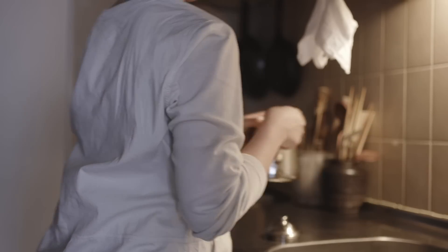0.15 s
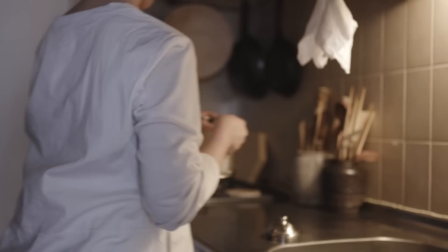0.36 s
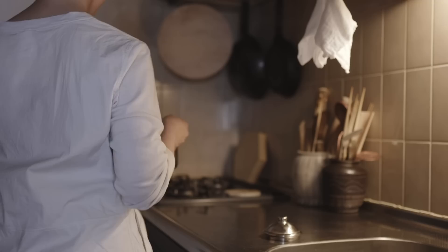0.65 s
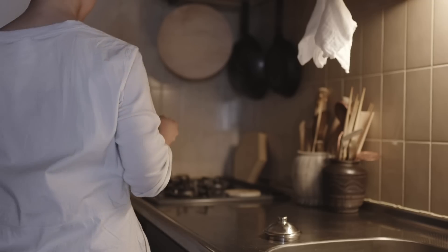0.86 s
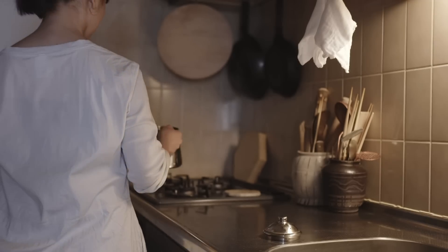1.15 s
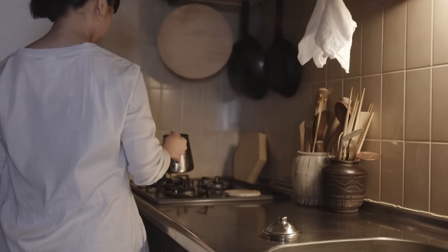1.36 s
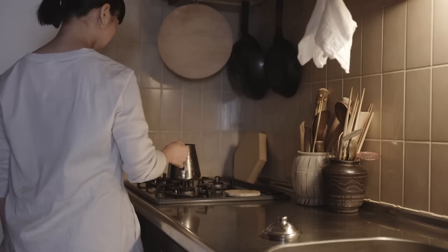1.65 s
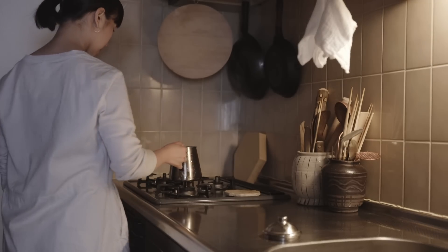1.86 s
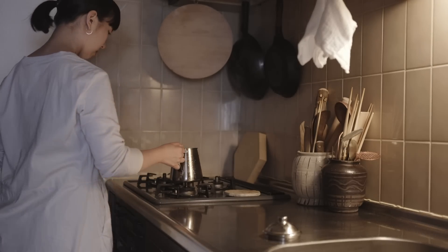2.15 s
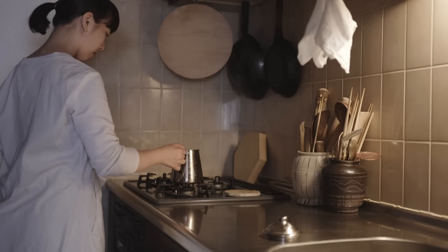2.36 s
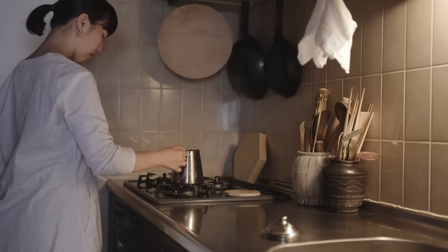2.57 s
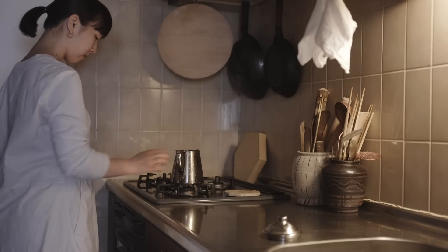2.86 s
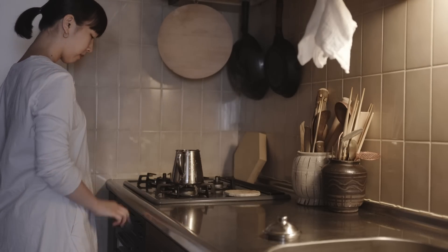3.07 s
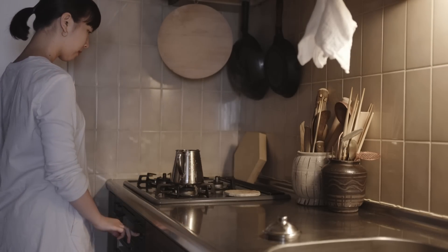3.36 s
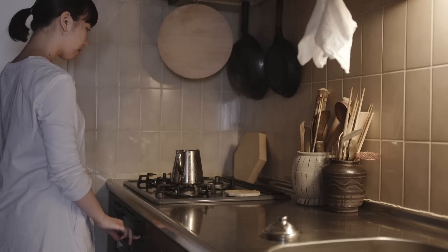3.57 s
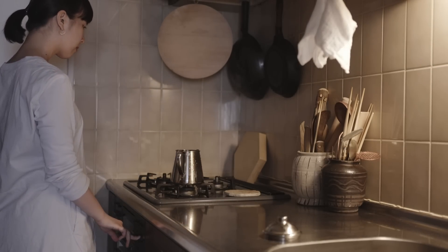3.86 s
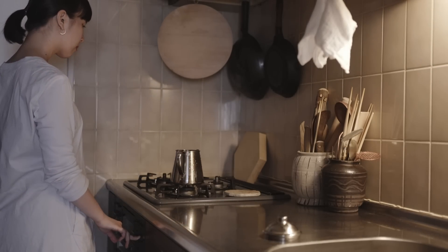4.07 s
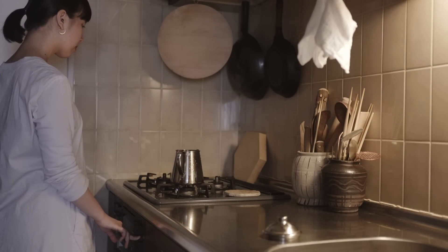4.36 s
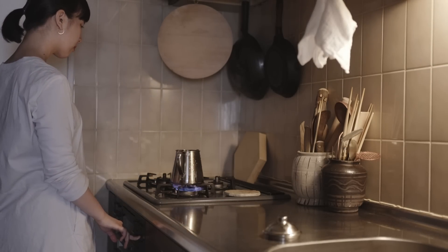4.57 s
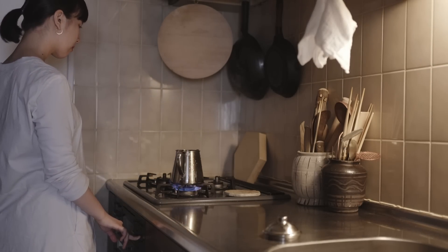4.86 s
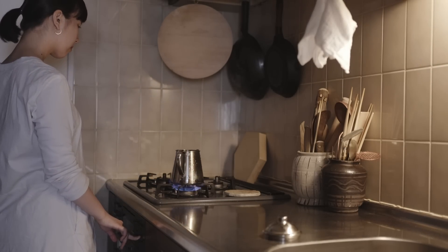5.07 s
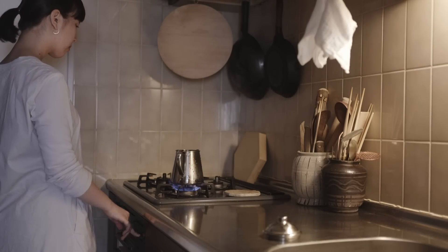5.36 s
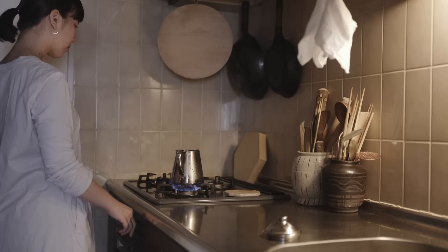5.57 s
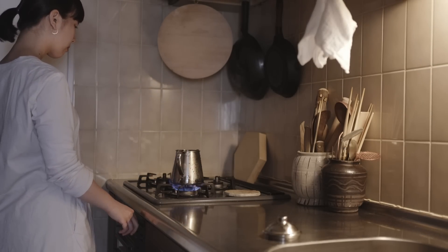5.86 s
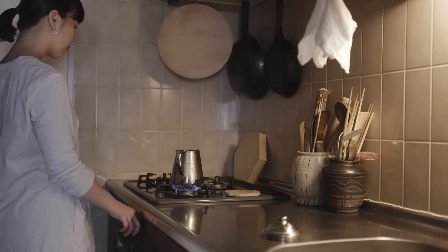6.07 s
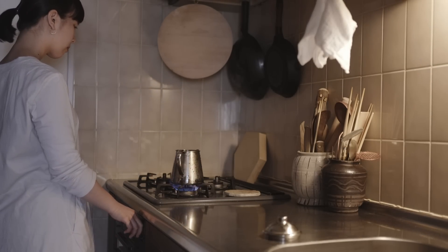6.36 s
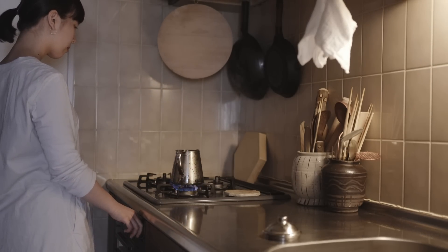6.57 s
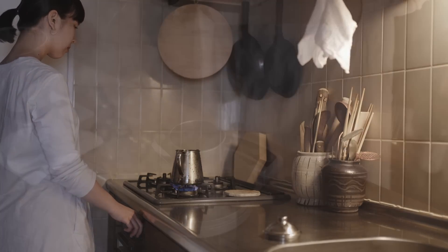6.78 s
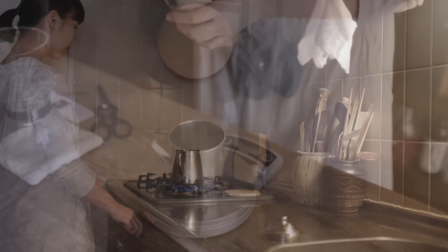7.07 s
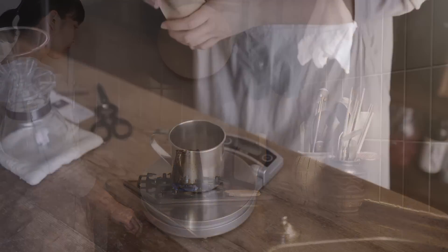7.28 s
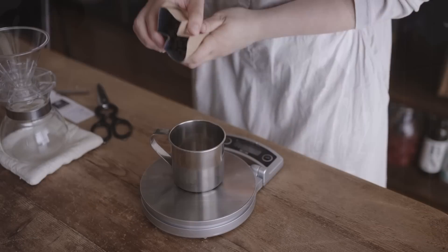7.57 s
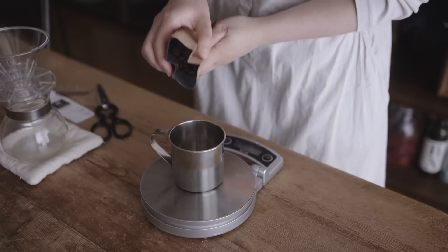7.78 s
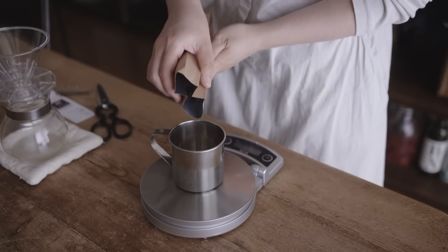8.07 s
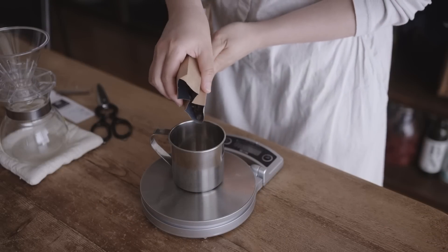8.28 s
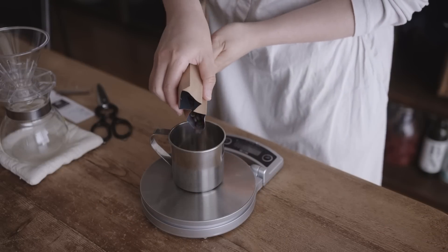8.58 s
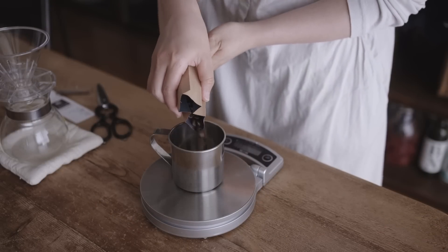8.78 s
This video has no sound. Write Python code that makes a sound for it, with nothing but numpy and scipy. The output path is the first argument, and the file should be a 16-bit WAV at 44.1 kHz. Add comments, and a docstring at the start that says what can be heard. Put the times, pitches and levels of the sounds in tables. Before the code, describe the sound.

A steel pot is set on a gas hob, the igniter snaps rapidly, then a paper bag rustles and roasted beans clatter into a metal mug.

```python
"""A gas igniter snaps fourteen times under a steel coffee pot in a tiled kitchen while the gas catches.
Each snap is one sharp impulse plus its reflections; dull ticks and two puffs of flame are shaped pulses and noise.
Before that the pot is set on the hob, with short noisy knocks, a metal ring and swishing cloth.
Afterwards a paper bag rustles and roasted beans slide in it, made of many tiny clicks.
Then the first few beans crack and ring in a steel mug; low room noise lies under it all, with a whine that fades."""
import sys
import numpy as np
from scipy import signal
from scipy.fft import rfft, irfft
from scipy.io import wavfile

SR = 44100
rng = np.random.default_rng(int(sys.argv[2]) if len(sys.argv) > 2 else 0)


def wav_record(signal):
    """Record a signal, one row per channel, as 16-bit PCM in the file named by sys.argv[1]."""
    frames = np.transpose(np.atleast_2d(signal))
    bounded = np.clip(frames, -1, 1)
    # unit amplitude maps onto the largest positive 16-bit level
    quanta = np.round(bounded * 32767).astype(np.int16)
    wavfile.write(sys.argv[1], SR, quanta)


N = 393372
TIME = np.arange(N) / SR   # seconds
AGE = TIME[:2 ** 14]   # seconds since a blow

# Ways a spark's sound travels by pot, hob and wall. Each row: delay in ms, average level in dB.
SPARK_PATHS = [(.6, 9.5), (1.4, 16), (3.2, 15.5), (4.3, 7.5), (5.5, 14.5), (7.6, 9.5)]
# Tone of the sparks. Each row: frequency in Hz, relative level in dB per Hz.
SPARK_COLOUR = [(300, -44), (900, -18), (1400, -13.5), (2200, -11.5), (3000, -9.5), (3700, -5), (5000, -5),
                (6500, -4.5), (8000, -0.5), (9000, -3), (11500, 5.5), (14000, 5), (16000, 4)]
# Resonances of the gap between burner and pot. Each row: frequency in Hz, width in Hz, level in dB.
BURNER_GAP = [(1796, 210, -5.5), (5560, 920, -1), (7120, 170, 7), (9300, 370, -11), (10770, 540, -5)]
# The igniter recharges at a steady rate, a little slower once the flame burns.
FIRST_SPARK_S, CATCH_S = 3.869, 4.3997
COLD_PERIOD_S, LIT_PERIOD_S, COLD_SPARKS, LIT_SPARKS = .13276, .13513, 4, 9
# Sparks grow as gas gathers, peak as it catches, then are weaker in the flame.
COLD_DB, COLD_RISE_DB_PER_S, CATCH_DB, LIT_DB, LIT_RISE_DB_PER_S = -13.4, 4.5, -9.5, -15.5, 1.2
# A dull tick follows each cold spark and the last one; the delay runs to the middle of the tick.
DULL_TICK_DELAY_S, DULL_TICK_PEAK_DB = .0042, -30

# Bright ticks of the pot's handle and of the knob going in.
# Each row: start in seconds, strength in dB, contact cut-off in Hz.
KNOB_TICKS = [(1.146, -43, 15000), (3.5705, -35.5, 15000), (3.575, -26.5, 15000)]
# Tone of those bright ticks. Each row: frequency in Hz, relative level in dB per Hz.
KNOB_COLOUR = [(300, -9.5), (1500, -13), (3200, -11.5), (4000, -1), (5500, 0), (7200, -7.5), (10000, -8),
               (12500, 1.5), (16000, -2)]
# Gas flaring as it catches. Each row: start in seconds, hold in seconds, level in dB.
FLARES = [(4.404, .12, -47), (5.349, 0.036, -45)]
FLARE_RISE_S, FLARE_FALL_DB_PER_S = .04, 160
# Tone of the flame. Each row: frequency in Hz, relative level in dB per Hz.
FLAME_COLOUR = [(60, -6), (200, -7), (330, 1), (700, -2.5), (1450, -2.5), (2100, -8.5), (4000, -21)]

# Beans landing in the mug. Each row: start in seconds, strength in dB, contact cut-off in Hz.
BEANS = [(8.5361, 0.5, 15000), (8.5418, -7, 15000), (8.5975, -11.5, 8000), (8.643, -10, 2400),
         (8.7355, -1, 11100), (8.791, -12.5, 3500), (8.8204, -9, 10100), (8.863, -20, 11800),
         (8.9039, -21, 3500), (8.908, -16.5, 12000)]
# Ringing of the mug. Each row: frequency in Hz, average level in dB, time to fall 60 dB in seconds.
MUG_MODES = [(790, -6, .06), (1000, -7, .1), (2700, -5, .04), (3085, 5, .11), (5880, -5, .14),
             (6600, -4, .14), (6820, -5, .15), (7750, -3, .14), (8100, -3, .15), (8970, -2, .15),
             (10400, -2, .18), (11000, -3, .2), (12630, -4, .14), (13880, -2, .12), (14350, -4, .12),
             (14810, -3, .1)]
# Tone of the bean cracks. Each row: frequency in Hz, relative level in dB per Hz.
BEAN_COLOUR = [(100, -18), (500, -23.5), (780, -2), (1500, -12), (2800, 3), (4000, -3), (6000, -0.5),
               (8000, 3.5), (11000, 1), (16000, 3.5)]
# Tone of the room's answer to the beans. Each row: frequency in Hz, relative level in dB per Hz.
BEAN_ROOM_COLOUR = [(200, -26), (550, -22), (900, -2), (1600, -7), (3000, -6), (6000, 1.5), (9000, 4),
                    (13000, 9.5), (16000, 3)]
MUG_RING_DB, MUG_ECHO_DB = -32.5, -17.5   # relative to the bean's strength
GRAZE_S, GRAZE_DB = 8.6147, -24   # one bean only grazes the wall, with a bright hiss

# Each tilt of the bag sets the beans sliding.
# Each row: start in seconds, rise in seconds, hold in seconds, level in dB.
SLIDES = [(6.76, 0.024, .28, -57), (7.11, 0.017, 0.029, -41), (7.382, 0.035, .03, -49),
          (7.692, 0.17, 0.037, -46.5), (8.025, 0.1, 0.17, -41), (8.434, 0.037, 0.36, -48.5)]
SLIDE_FALL_DB_PER_S = 66.5
# Tone of the sliding beans. Each row: frequency in Hz, relative level in dB per Hz.
SLIDE_COLOUR = [(150, -23.5), (400, -15.5), (700, -8.5), (1180, -0.5), (1600, -2), (2200, -5.5),
                (3500, -8.5), (6000, -14.5), (10000, -30), (16000, -32)]
# Fingers brushing the paper. Each row: start in seconds, hold in seconds, level in dB.
BRUSHES = [(6.778, 0.12, -53), (7.086, 0.25, -47), (7.765, .07, -54), (8.082, 0.17, -49.5),
           (8.58, .27, -46)]
BRUSH_RISE_S, BRUSH_FALL_DB_PER_S = 0.065, 78
# Tone of brushed paper. Each row: frequency in Hz, relative level in dB per Hz.
PAPER_COLOUR = [(1500, -12), (3500, -2), (6000, -1.5), (9000, -2.5), (13000, -0.5), (16000, -2)]
# Separate creases snapping in the bag, some strong and some faint.
# Each row: start in seconds, strength in dB, contact cut-off in Hz.
CREASES = [(6.869, -53, 16000), (7.119, -36, 6000), (7.174, -40, 6000), (7.627, -60, 16000),
           (7.756, -42.5, 9000), (8.074, -33, 9200), (8.129, -38.5, 15000), (8.164, -36.5, 9000),
           (8.38, -40.5, 9000), (8.459, -34.5, 4000)]
# Tone of the creases. Each row: frequency in Hz, relative level in dB per Hz.
CREASE_COLOUR = [(120, -15.5), (400, -9.5), (800, -6), (1300, 0.5), (2200, -9), (3600, -3), (6500, -13.5),
                 (16000, -12.5)]
# More creases come at random: rate while beans slide, and contact cut-off.
RANDOM_CREASES_PER_S, RANDOM_CREASE_HZ = 14, 7000
RANDOM_CREASE_DB, RANDOM_CREASE_SPREAD_DB = -2.5, 4   # strength relative to the sliding beans

# Blows on the iron grate, from the pot and from the knob's jolt.
# Each row: start in seconds, strength in dB, contact cut-off in Hz, dB lost per rebound.
GRATE_KNOCKS = [(2.33, -30.5, 7000, 2.5), (2.453, -33.5, 5870, 14), (2.509, -29.5, 12900, 2.5),
                (2.756, -42, 6800, 5.5), (3.602, -39.5, 900, 14)]
# Tone of the grate. Each row: frequency in Hz, relative level in dB per Hz.
GRATE_COLOUR = [(60, -12), (200, -15.5), (340, -4), (500, -5), (700, -6), (1000, -11.5), (2500, -11),
                (4500, -12), (8000, -15.5), (16000, -14.5)]
REBOUND_S, REBOUND_KEEPS_HZ = .017, 0.55   # time between rebounds; share of the cut-off that each keeps
# Light clinks of the pot. Each row: start in seconds, strength in dB, contact cut-off in Hz.
CLINKS = [(2.078, -41, 14000), (2.087, -38.5, 16000)]
# Tone of the clinks. Each row: frequency in Hz, relative level in dB per Hz.
CLINK_COLOUR = [(500, -20), (900, 7.5), (1750, -6), (2200, 2), (4700, -3.5), (6000, 5), (8000, -8),
                (12500, 0), (16000, -11)]
# Ringing of the pot. Each row: frequency in Hz, average level in dB, time to fall 60 dB in seconds.
POT_MODES = [(900, 0, .08), (2240, -1, .08), (3400, -4, .12), (4295, 3, 0.31), (5920, -4, 0.1),
             (6300, -3, 0.11), (7600, -9, .13), (8450, -4.5, 0.21), (12400, -6, .12), (13800, -1, .12)]
POT_RING_DB = -7   # the free wall's ring, relative to the clink's strength
# Small hard taps around the hob, before and after lighting.
# Each row: start in seconds, strength in dB, contact cut-off in Hz.
TAPS = [(.276, -51, 2540), (.404, -38.5, 12000), (1.918, -49.5, 4000), (3.303, -48, 2980),
        (3.415, -47.5, 2530), (3.44, -46, 3000), (3.495, -47, 4000), (6.125, -52.5, 3000)]
# Tone of the taps. Each row: frequency in Hz, relative level in dB per Hz.
TAP_COLOUR = [(200, -6), (600, -2), (900, 0), (1500, 1.5), (2500, -6.5), (6000, -11), (16000, -15)]
# Hollow bumps. Each row: start in seconds, strength in dB, contact cut-off in Hz.
BUMPS = [(.412, -52, 900), (.499, -38.5, 1500), (.515, -47.5, 900)]
# Tone of the bumps. Each row: frequency in Hz, relative level in dB per Hz.
BUMP_COLOUR = [(100, -36), (280, -10.5), (420, 5), (520, -14), (660, -0.5), (900, -33), (3000, -25)]
# The pot's base scraping along the grate.
# The one row: start in seconds, rise in seconds, hold in seconds, level in dB.
SCRAPE = (2.29, 0.03, 0.08, -51.5)
SCRAPE_FALL_DB_PER_S = 195

# Arm movements that swish the sleeve. Each row: start in seconds, hold in seconds, level in dB.
SWISHES = [(0.388, 0.092, -54), (0.879, 0.11, -46.5), (1.17, 0.1, -55.5), (1.295, .005, -51.5),
           (1.638, .08, -51.5)]
SWISH_RISE_S, SWISH_FALL_DB_PER_S = 0.033, 126
# Tone of the cloth. Each row: frequency in Hz, relative level in dB per Hz.
CLOTH_COLOUR = [(500, -7.5), (1000, 0), (1400, -1), (2300, -4.5), (8500, -6), (16000, -8.5)]

# Loudness of the room noise over time. Each row: time in seconds, level in dB.
AIR_LEVEL = [(0.0, -59.5), (2.41, -57), (5.62, -58), (6.7, -63)]
# Tone of the room noise. Each row: frequency in Hz, relative level in dB per Hz.
AIR_COLOUR = [(15, -30), (25, -18.5), (59, 1), (153, -11), (195, -7.5), (531, -8), (714, -9.5), (1040, -8),
              (1740, -14.5), (2110, -20), (2550, -19.5), (3080, -25.5), (8140, -26), (9840, -26.5),
              (16000, -24.5)]
# Faint electrical whine. Each row: frequency in Hz, level in dB before the fade.
WHINE = [(6751, -82), (8253, -83.5), (13873, -86.5), (14998, -83)]
# How long the kitchen echoes at length 1. Each row: frequency in Hz, time to fall 60 dB in seconds.
ROOM_T60 = [(200, 0.48), (1000, .3), (3000, 0.27), (7000, 0.24), (15000, .18)]
CUTOFF_HZ = 15950   # top of the finished sound


def igniter(room_db=-3, scatter_db=-1, scatter_s=.0034, change=0.356):
    """Each spark is one sharp impulse sent down the same paths; the wandering arc changes them a little."""
    def scattered():
        """Reflections crowd in from the hob and tiles, then the room takes over."""
        near = np.interp(AGE - scatter_s, AGE, burst(t60=0.088), left=0)
        room = room_tail(rise_s=0.00078, length=0.93)
        return from_db(scatter_db) * near + from_db(room_db) * room

    delay_ms, path_db = np.transpose(SPARK_PATHS)
    arrivals = np.round(delay_ms * SR / 1000).astype(int)
    signs = (-1) ** np.arange(len(path_db))
    out = np.zeros(N)
    usual = scattered()
    for s, db in sparks():
        snap = (usual + change * scattered()) / np.hypot(1, change)
        varied_db = path_db + rng.normal(0, 2.4, len(path_db))
        snap[arrivals] += signs * from_db(varied_db)
        add(out, s, from_db(db) * snap)
    return resonate(colour(out, SPARK_COLOUR), BURNER_GAP)


def sparks():
    """Rows (s, dB): an even run into cold gas, the spark that lights it, and an even run in the flame."""
    cold_times = COLD_PERIOD_S * np.arange(COLD_SPARKS)
    lit_times = LIT_PERIOD_S * np.arange(1, LIT_SPARKS + 1)
    cold = [(FIRST_SPARK_S + t, COLD_DB + COLD_RISE_DB_PER_S * t) for t in cold_times]
    lit = [(CATCH_S + t, LIT_DB + LIT_RISE_DB_PER_S * t) for t in lit_times]
    return cold + [(CATCH_S, CATCH_DB)] + lit


def dull_ticks():
    """Single rounded pulses, a millisecond long, heard as a dull tick."""
    out = np.zeros(N)
    pulse = np.hanning(SR // 1000)
    half_s = len(pulse) / 2 / SR
    run = sparks()
    for s, _ in run[:COLD_SPARKS] + run[-1:]:
        add(out, s + DULL_TICK_DELAY_S - half_s, from_db(DULL_TICK_PEAK_DB) * pulse)
    return out


def burner():
    """Handle and knob tick, and the gas lights in two soft puffs of noise."""
    ticks = knocks(KNOB_TICKS, KNOB_COLOUR, crack_db=6.5, crack_t60=0.014,
                   room_db=2, rise_s=0.0032, length=0.89)
    flaring = together(swell(s, FLARE_RISE_S, hold_s, db, FLARE_FALL_DB_PER_S) for s, hold_s, db in FLARES)
    flame = colour(rng.standard_normal(N), FLAME_COLOUR)
    return ticks + flaring * flame


def mug():
    """A hard bean cracks on the steel with a pitch of its own, sets the wall ringing and wakes the room."""
    cracks, rings, echoes = np.zeros((3, N))
    for s, db, contact_hz in BEANS:
        shell = [(rng.uniform(5600, 8500), 1800, -2)]   # Hz, width Hz, dB
        crack = resonate(burst(t60=0.0064), shell)
        echo = room_tail(rise_s=0.00045, length=0.99)
        add(cracks, s, from_db(db) * soften(crack, contact_hz))
        add(rings, s, from_db(db + MUG_RING_DB) * soften(ringing(MUG_MODES), contact_hz))
        add(echoes, s, from_db(db + MUG_ECHO_DB) * soften(echo, contact_hz))
    add(echoes, GRAZE_S, from_db(GRAZE_DB) * room_tail(rise_s=.001))
    return colour(cracks, BEAN_COLOUR) + in_room(rings, wet=0.35) + colour(echoes, BEAN_ROOM_COLOUR)


def bag():
    """Beans tumble along the paper, fingers brush it and creases snap."""
    sliding = together(swell(*slide, SLIDE_FALL_DB_PER_S) for slide in SLIDES)
    brushing = together(swell(s, BRUSH_RISE_S, hold_s, db, BRUSH_FALL_DB_PER_S) for s, hold_s, db in BRUSHES)
    tumbling = colour(grains(per_s=330, spread_db=4, wet=0.92, clump_db=5), SLIDE_COLOUR)
    # the hollow sounds as the bag's mouth swings past
    facing = np.interp(TIME, [7.5, 7.8, 8.15], [0, 1, .2])
    hollow = resonate(tumbling, [(1150, 150, 6.0)]) - tumbling
    tumbling = rms_one(tumbling + facing * hollow)
    paper = colour(grains(per_s=800, spread_db=3.0, wet=1.0, clump_db=3.5), PAPER_COLOUR)
    creases = knocks(CREASES + random_creases(sliding), CREASE_COLOUR, crack_db=8.0, crack_t60=0.012,
                     room_db=-2.5, rise_s=0.0013, length=0.78)
    return sliding * tumbling + brushing * paper + creases


def random_creases(sliding):
    """Rows (s, dB, Hz): the paper gives way at random, as strongly as the beans push on it."""
    at = np.flatnonzero((rng.random(N) < RANDOM_CREASES_PER_S / SR) & (sliding > 0))
    spread_db = RANDOM_CREASE_SPREAD_DB * rng.standard_normal(N)[at]
    db = 20 * np.log10(sliding[at]) + RANDOM_CREASE_DB + spread_db
    return [(i / SR, level_db, RANDOM_CREASE_HZ) for i, level_db in zip(at, db)]


def pot():
    """The pot clinks against the grate and rocks to rest, with taps and bumps: short knocks and a ring."""
    out = knocks(rebounding(GRATE_KNOCKS), GRATE_COLOUR, crack_db=-2, crack_t60=0.0099,
                 room_db=1.5, rise_s=0.0028, length=0.99)
    out += knocks(CLINKS, CLINK_COLOUR, crack_db=-10, crack_t60=0.014,
                  room_db=0.0, rise_s=0.0024, length=0.94)
    out += knocks(TAPS, TAP_COLOUR, crack_db=4.5, crack_t60=0.016,
                  room_db=-0.5, rise_s=0.0024, length=0.99)
    out += knocks(BUMPS, BUMP_COLOUR, crack_db=15.0, crack_t60=0.014,
                  room_db=-2.5, rise_s=0.0067, length=0.75)
    s, db, _ = CLINKS[0]   # the first touch sets the free wall ringing
    add(out, s, from_db(db + POT_RING_DB) * in_room(ringing(POT_MODES), wet=0.83))
    return out


def rebounding(rows, count=3):
    """Each blow lands count times in all, weaker and duller every time."""
    return [(s + k * REBOUND_S, db - k * loss_db, contact_hz * REBOUND_KEEPS_HZ ** k)
            for s, db, contact_hz, loss_db in rows for k in range(count)]


def scrape():
    """Steel drags on iron in many tiny slips, with a thin, high hiss."""
    slips = grains(per_s=3000, spread_db=3, wet=1.9, clump_db=4.5)
    hiss = colour(slips, [(5000, -12), (9500, -3), (15000, -1)])
    return swell(*SCRAPE, SCRAPE_FALL_DB_PER_S) * hiss


def clothes():
    """Cloth brushes on cloth in very fine slips."""
    moving = together(swell(s, SWISH_RISE_S, hold_s, db, SWISH_FALL_DB_PER_S) for s, hold_s, db in SWISHES)
    return moving * colour(grains(per_s=5000, spread_db=6.5, wet=1.2, clump_db=1.5), CLOTH_COLOUR)


def air():
    """Low room noise that slowly changes level, and a faint whine that fades as the bag is picked up."""
    level = from_db(np.interp(TIME, *np.transpose(AIR_LEVEL)))
    noise = level * colour(rng.standard_normal(N), AIR_COLOUR)
    whine = sum(np.sqrt(2) * from_db(db) * np.sin(2 * np.pi * hz * TIME) for hz, db in WHINE)
    return noise + whine * np.interp(TIME, [6.8, 7.6], [1, 0])


def knocks(rows, spectrum, crack_db, crack_t60, room_db, rise_s, length):
    """Blows on one object: a short crack and the room's answer, in the object's colour."""
    out = np.zeros(N)
    for s, db, contact_hz in rows:
        crack = from_db(crack_db) * burst(crack_t60)
        room = from_db(room_db) * room_tail(rise_s, length)
        add(out, s, from_db(db) * soften(crack + room, contact_hz))
    return colour(out, spectrum)


def burst(t60):
    """A quickly dying rattle of micro-contacts: a few sharp ones among many weak."""
    contacts = rng.standard_normal(len(AGE)) * rng.exponential(1, len(AGE))
    return rms_one(contacts) * dying(t60)


def ringing(modes):
    """Struck metal is a sum of dying tones: every blow feeds them a little differently."""
    hz, db, t60 = np.transpose(modes)[:, :, None]
    signs = rng.choice([-1, 1], hz.shape)
    strength = from_db(db + 2 * rng.standard_normal(hz.shape)) * signs
    return np.sum(strength * np.sin(2 * np.pi * hz * AGE) * dying(t60), axis=0)


def grains(per_s, spread_db, wet, clump_db):
    """Tiny slips of uneven size come in clumps, with their room echo; rms 1."""
    knots = np.arange(0, TIME[-1], .012)   # crowding wanders in 12 ms steps
    crowding = from_db(clump_db * np.interp(TIME, knots, rng.standard_normal(len(knots))))
    sizes = from_db(spread_db * np.minimum(rng.exponential(1, N), 4)) * rng.choice([-1, 1], N)
    slips = sizes * (rng.random(N) < crowding * per_s / SR)
    return rms_one(in_room(slips, wet))


def soften(x, hz):
    """A softer contact loses its treble."""
    return signal.sosfilt(signal.butter(1, min(hz, SR / 2 - 1000), fs=SR, output="sos"), x)


def resonate(x, modes):
    """Add resonances, rows (Hz, width Hz, dB), on top of the plain sound."""
    return x + sum(from_db(db) * signal.lfilter(*signal.iirpeak(hz, hz / width, fs=SR), x)
                   for hz, width, db in modes)


def colour(x, spectrum, size=4096):
    """Causal filter of the given spectrum that rolls off below it; white noise keeps its level."""
    hz = np.arange(size // 2 + 1) * SR / size
    roll_off = (hz + 1) / np.hypot(hz, spectrum[0][0] / 2)
    gain = from_db(at_hz(spectrum, hz)) * roll_off
    # a one-sided cepstrum gives the filter with the least delay
    cepstrum = irfft(np.log(gain))[:size // 2]
    cepstrum[0] = 0
    kernel = irfft(np.exp(rfft(2 * cepstrum, size)))
    return signal.oaconvolve(x, kernel / np.linalg.norm(kernel))[:len(x)]


def room_tail(rise_s, length=1):
    """Spread-out kitchen echo: noise builds up from silence while each octave dies at its own rate."""
    white = rfft(rng.standard_normal(len(AGE)))
    hz = np.arange(len(AGE) // 2 + 1) * SR / len(AGE)
    octave = np.round(np.log2(np.clip(hz / SR * 3, 2 ** -6, 1)))   # 0 is centred on SR / 3
    tail = np.zeros(len(AGE))
    for k in range(-6, 1):
        t60 = length * at_hz(ROOM_T60, 2 ** k * SR / 3)
        tail += irfft(white * (octave == k)) * dying(t60)
    return tail * (1 - np.exp(-AGE / rise_s))


def in_room(x, wet):
    """A sound with its kitchen echo."""
    echo = room_tail(0.0054)
    return x + wet * signal.oaconvolve(x, echo / np.linalg.norm(echo))[:len(x)]


def dying(t60):
    """A decay that loses 60 dB in t60 seconds."""
    return np.exp(-np.log(1000) * AGE / t60)


def swell(s, rise_s, hold_s, db, fall_db_per_s):
    """Gain of one movement: it rises, holds and dies away."""
    age = TIME - s
    falling_s = np.maximum(age - rise_s - hold_s, 0)
    return np.clip(age / rise_s, 0, 1) * from_db(db - fall_db_per_s * falling_s)


def together(swells):
    """Overlapping movements add in power."""
    return np.sqrt(sum(gain ** 2 for gain in swells))


def from_db(db):
    """Decibels to gain."""
    return 10 ** (np.asarray(db) / 20)


def rms_one(x):
    """Scale to rms (average strength) 1."""
    return x / np.sqrt(np.mean(x ** 2) + 1e-20)


def at_hz(points, hz):
    """Read a table on a log-frequency axis."""
    f, value = np.transpose(points)
    return np.interp(np.log(np.maximum(hz, 1)), np.log(f), value)


def add(track, s, sound):
    """Mix a sound in at a time in seconds."""
    start = round(s * SR)
    track[start:start + len(sound)] += sound[:N - start]


def scene():
    """All the sounds add up in one channel."""
    hob = igniter() + dull_ticks() + burner() + pot() + scrape()
    return (hob + mug() + bag() + clothes() + air())[None]


def record(dry):
    """Full scale limits the peaks, then a steep filter cuts the top."""
    limited = np.clip(dry, -1, 1)
    return signal.sosfilt(signal.ellip(10, .1, 70, CUTOFF_HZ, fs=SR, output="sos"), limited)


dry = scene()
out = record(dry)
wav_record(out)
```